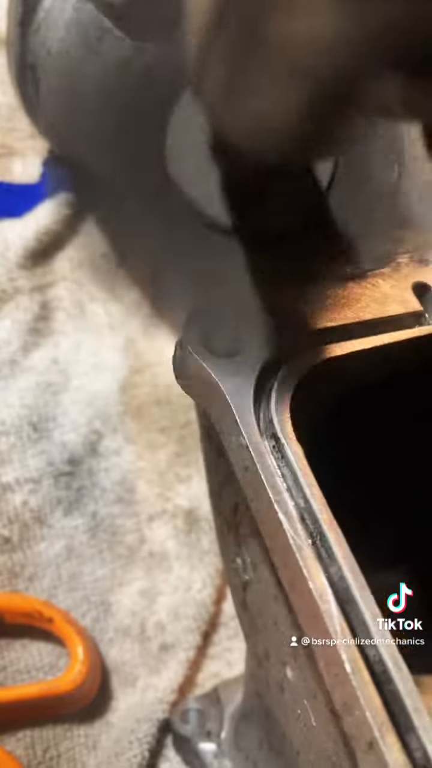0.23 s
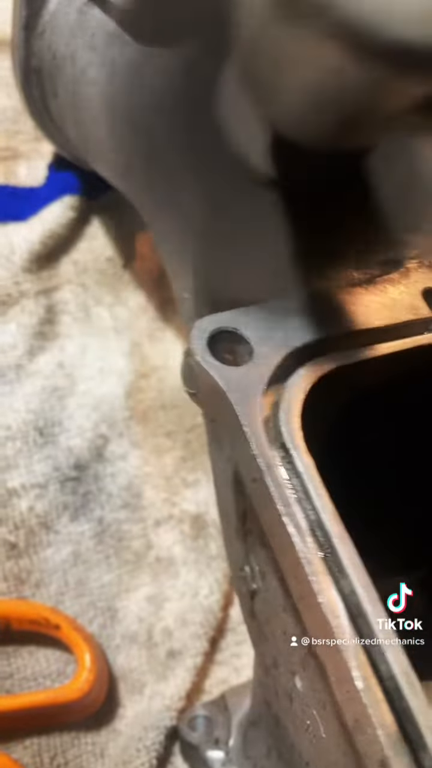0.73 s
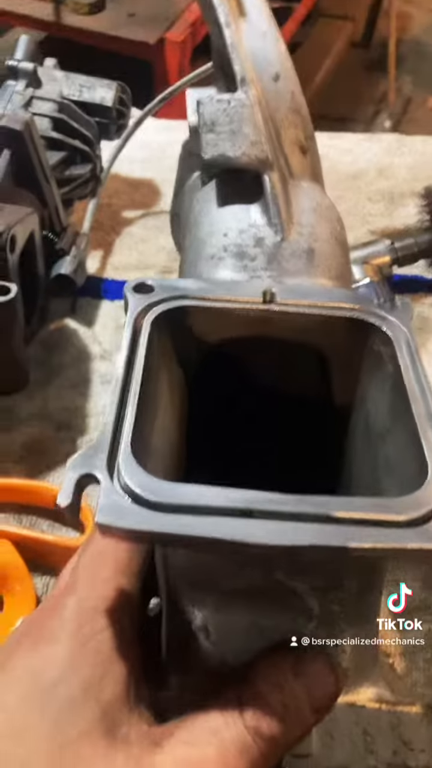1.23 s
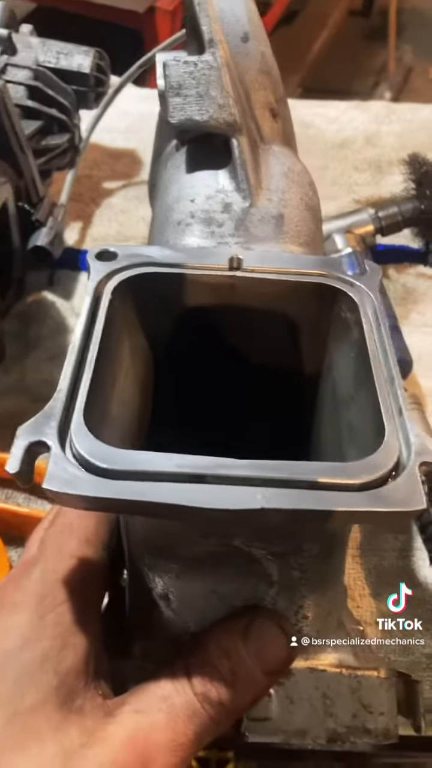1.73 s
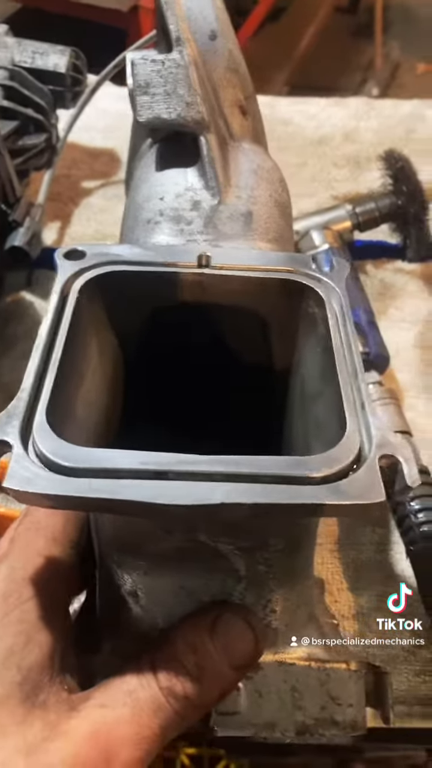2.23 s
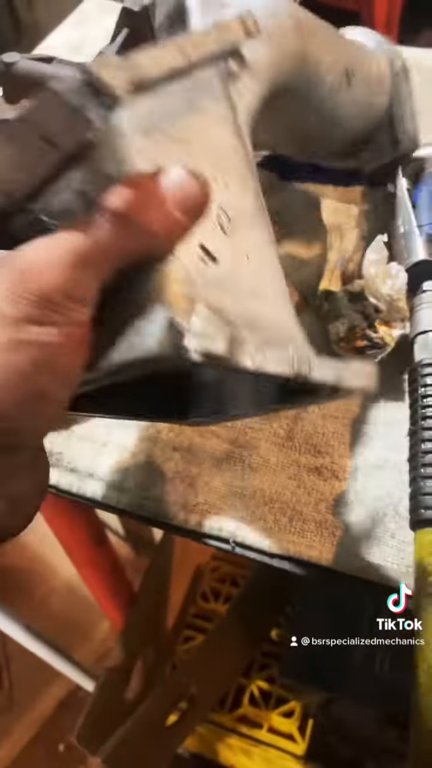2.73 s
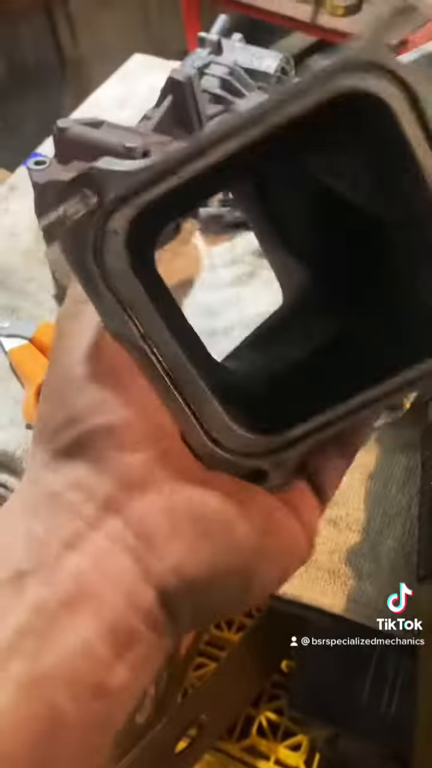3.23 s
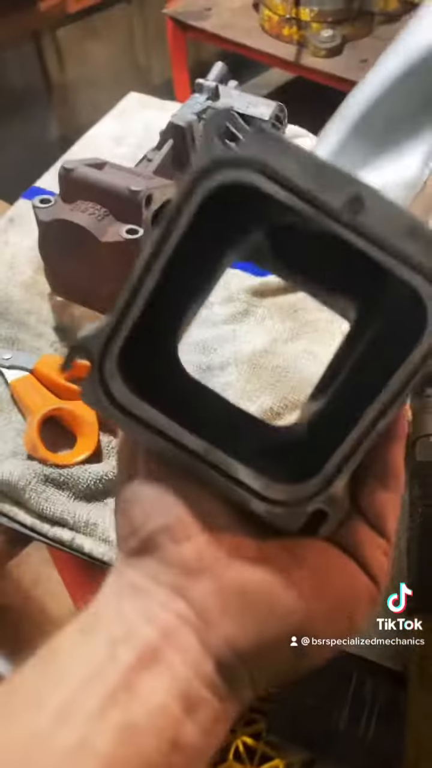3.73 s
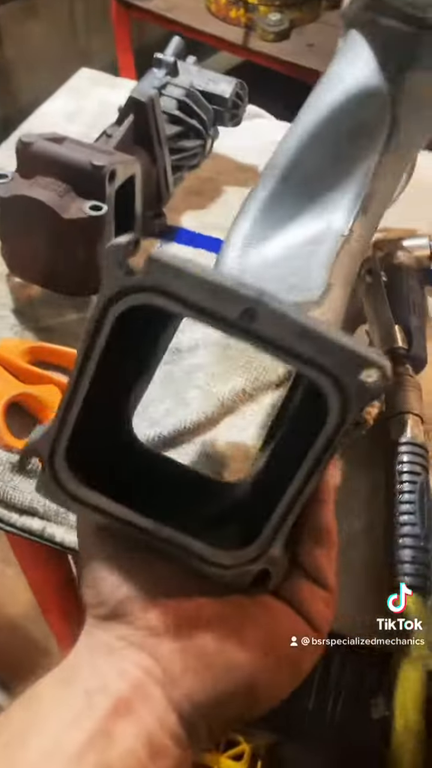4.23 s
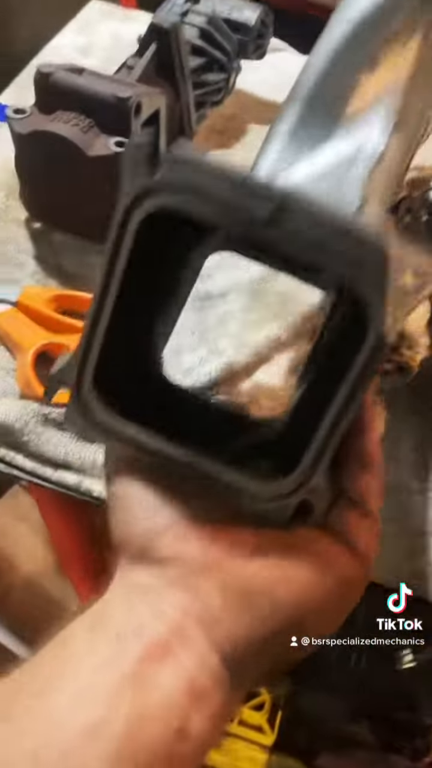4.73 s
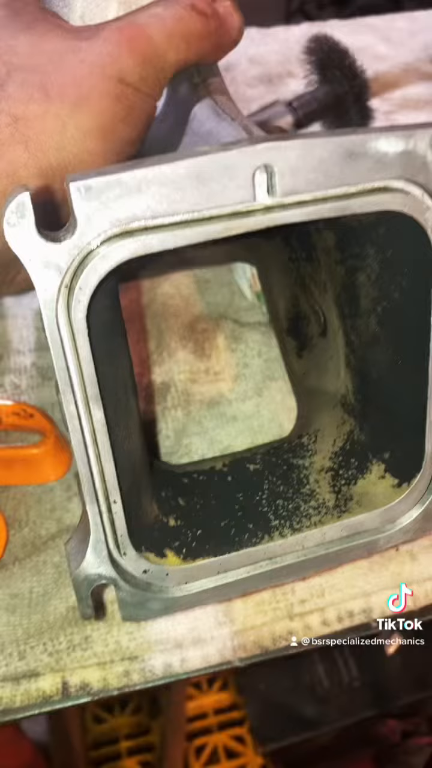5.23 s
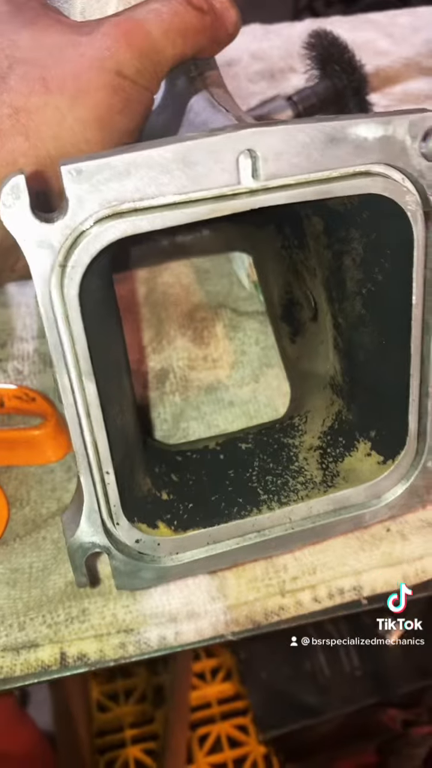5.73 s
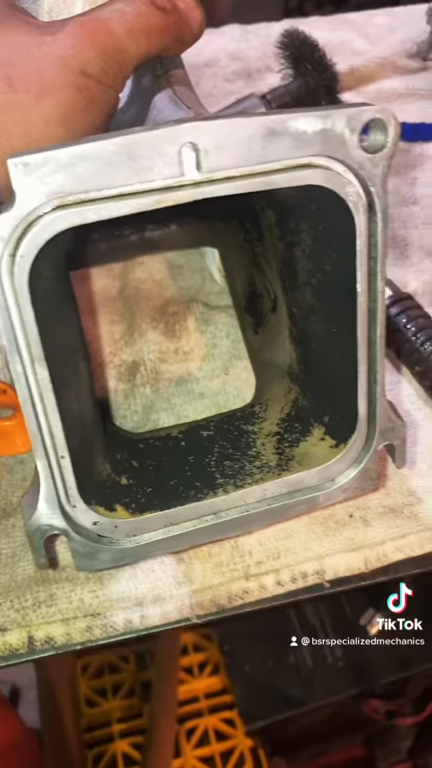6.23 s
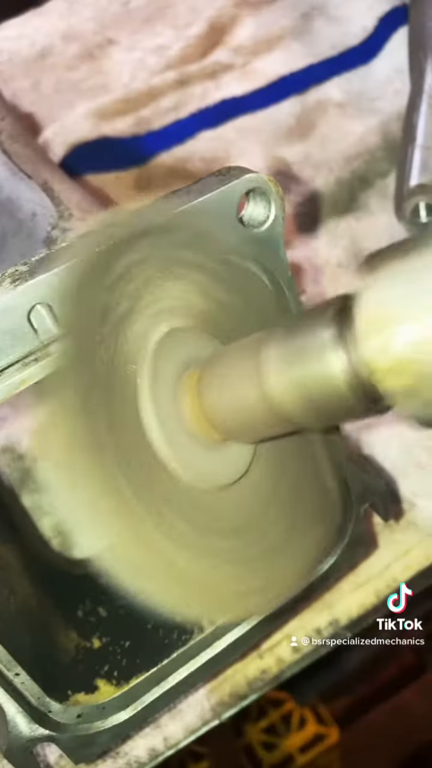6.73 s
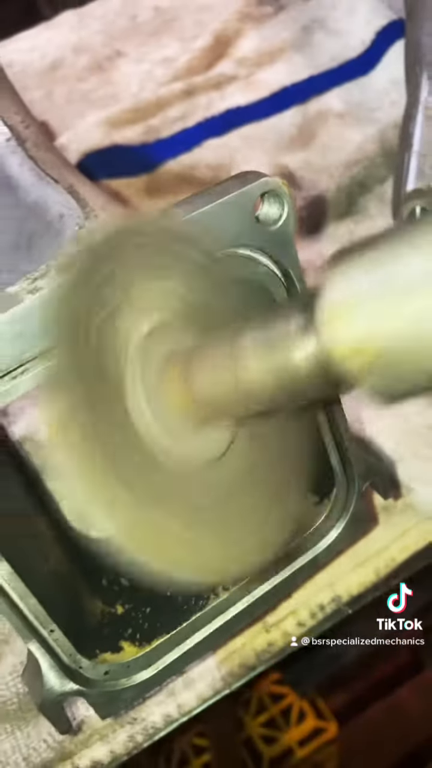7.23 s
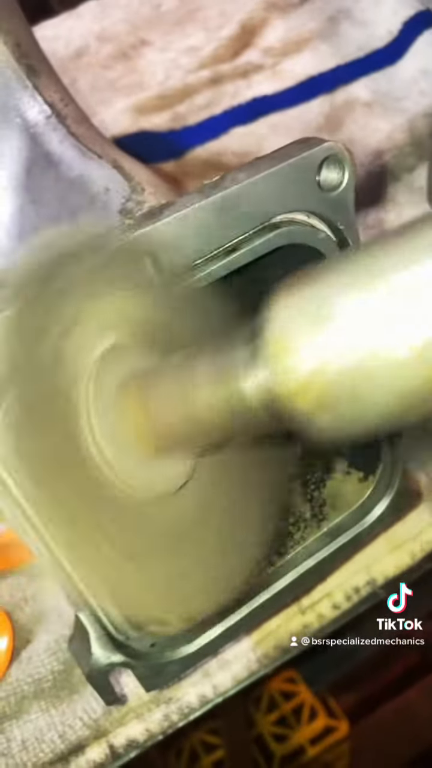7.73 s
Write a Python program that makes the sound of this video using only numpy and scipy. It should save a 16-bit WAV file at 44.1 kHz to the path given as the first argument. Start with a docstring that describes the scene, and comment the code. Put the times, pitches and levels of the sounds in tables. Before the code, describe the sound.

A high, wavering grinder whine and the scratch of a wire wheel on hollow aluminium open the sound, close up in a workshop. After a short silence, an air compressor hums and clatters steadily for about five seconds, cutting out briefly twice, and the casting bumps softly in the hand. Finally the wheel comes back with a louder, lower whine and harsh scraping, making the metal ring and squeal over the drone.

```python
"""First comes a high whine and scratch: an air die grinder runs a wire wheel over a hollow aluminium
casting, close by in a workshop. The whine sags whenever the wheel is pressed on, and each bite makes
the casting ring and squeal. A piston machine, likely the air compressor, drones underneath. It is heard
without the grinder between the two passes, when it also makes the air in the casting throb.
The sound comes in five short parts with silent pauses between them."""
import sys
import numpy as np
from scipy import signal
from scipy.fft import rfft, irfft
from scipy.io import wavfile
from scipy.ndimage import uniform_filter1d

SR = 44100
rng = np.random.default_rng(int(sys.argv[2]) if len(sys.argv) > 2 else 0)


def persist_wave(psi):
    """Save psi, clipped to +-1, as 16-bit WAV."""
    counts = np.round(np.clip(psi, -1, 1) * 32767).astype(np.int16)
    wavfile.write(sys.argv[1], SR, np.atleast_2d(counts).T)


N = 352800
TIME, BINS = np.arange(N) / SR, np.fft.rfftfreq(N, 1 / SR)
STROKE_HZ, CAVITY_HZ = 30.368, 1122  # piston rate; note of the air inside the casting

# the five parts: start t/s, end t/s, moment of one piston stroke t/s, compressor level/dB
PARTS = [(0, 1.05, 0.094, -14.5), (1.209, 2.4145, 1.305, 0), (2.588, 5.247, 2.52, 0),
         (5.423, 6.582, 5.465, 0), (6.776, 8.01, 7.8, -10)]
# rotor speed in the passes over the casting's neck and its flange (rim): t/s, f/Hz
NECK_SPEED = [(0.0, 662.2), (0.132, 626.6), (0.188, 632.9), (0.272, 619.2), (0.49, 723.4), (0.528, 737.2),
              (0.59, 735.9), (0.656, 668.5), (0.912, 747.4), (1.045, 738.3)]
FLANGE_SPEED = [(6.78, 431.6), (6.878, 416), (6.99, 440.4), (7.13, 360), (7.282, 398.4), (7.34, 388),
                (7.422, 350.8), (7.54, 435.5), (7.602, 477.6), (7.71, 503), (7.798, 482), (7.91, 508),
                (8.0, 486)]
# tones of the whine: multiple of the rotor speed, relative level/dB
NECK_WHINE = [(1, 0), (1.5, -28), (2, -7), (3, -13), (4, -.5), (5, -8), (6, -14), (8, -14)]
FLANGE_WHINE = [(1, 0), (2, -12), (3, -21), (4, -10), (5, -7), (6, -9), (7, -12), (8, -8.5), (9, -9.5),
                (10, -14), (11, -16)]
# spectrum of the scratching wires: f/Hz, relative level/dB
NECK_SCRATCH = [(150, -5), (500, -7.5), (900, -9.5), (1800, -12), (2150, -8), (2550, 4.5), (3100, -2.5),
                (3700, 3), (4900, -4), (6200, -1), (8300, -5), (9700, -0.5), (11200, -9), (15500, -15.5)]
FLANGE_SCRATCH = [(40, -17), (85, -1.5), (170, -14), (450, -17.5), (900, -14), (1700, -19.5), (2200, 2),
                  (3200, 2), (3650, -5), (4500, 0), (5400, -6.5), (7200, -6.5), (8400, -14.5), (10200, -11),
                  (12200, -21), (13600, -16), (15500, -27)]
# the wheel bites: t/s, half length t/s, change in scratch level/dB, ring level/dB, squeal f/Hz
BITES = [(0.02, 0.06, 0, -28, 5761), (0.11, 0.04, 1, -33.5, 6902), (0.24, 0.044, 0, -33.5, 6245),
         (0.53, .025, 0, -40, 5124), (0.641, 0.044, 2, -29.5, 6902), (6.778, .03, 4, -35, 3299),
         (6.845, 0.041, -1.5, -28.5, 5336), (7.003, 0.03, 0, -35, 3299), (7.08, .035, -2, -32.5, 5761),
         (7.168, 0.035, -1, -37, 6245), (7.27, .025, 1.5, -35, 3299), (7.373, .025, 1, -29, 5761),
         (7.415, .02, -1, -31, 5336), (7.46, 0.027, 0.5, -26, 3299), (7.47, .02, 1.5, -35, 5761),
         (7.72, 0.11, 0.5, -29.5, 3299), (7.8, .022, 0, -34, 5336)]
# the casting's ringing notes: f/Hz, relative level/dB brushed on the neck, the same on the flange
CASTING_NOTES = [(3299, -5, 0), (3530, -18, -12), (3855, -18, -12), (4325, -6, -22), (4521, -11, -9),
                 (5124, 0, -22), (5336, -18, -4), (5549, -7, -20), (5761, -5, 1.5), (6245, -5, -6),
                 (6600, -20, -8), (6902, 0, -20), (7321, -9, -10), (7482, -9, -8), (7573, -10, -20),
                 (8092, -20, -5), (8749, -5, -20), (8800, -20, -6), (9440, -8, -22), (10229, -8, -20),
                 (11649, -22, -13), (14260, -15, -22), (14648, -11, -26), (15000, -15, -28)]
# a thin whistle late in the first pass: t/s, level/dB
THIN_WHISTLE = [(.42, -68.5), (.52, -37.5), (.7, -48.5), (.9, -50), (1.02, -35)]
# the casting's open mouth in each of the three middle parts: throb level/dB, whistle level/dB
MOUTH = [(-33.5, -48), (-31.5, -43), (-32, -41.5)]
# the casting is turned in the hand: t/s, half length t/s, change in throb and in whistle level/dB
HAND_TURNS = [(2.12, 0.06, -4.5, 2), (2.85, 0.39, 7, -9.5), (3.5, 0.29, 4, 1), (3.85, 0.14, 0.5, 4),
              (6.3, .12, 5, 1.5)]
# hollow bands of hiss around the bench: f/Hz, width f/Hz, level/dB in each middle part
HOLLOWS = [(2530, 780, -57, -63, -45.5), (4300, 760, -44.5, -42, -40.5), (7100, 1700, -46.5, -51, -38.5),
           (10130, 1700, -39, -52, -59.5)]
# tones of the compressor's drone: multiple of the stroke rate, relative level/dB
DRONE = [(1, -36), (2, -17.5), (3, -10.5), (4, -7), (5, -10.5), (6, -16), (7, -30.5), (8, 2.5), (9, -12.5),
         (10, -7), (11, -10.5), (12, -11), (13, -36.5), (14, -5), (15, -24.5)]
# tones that change with the place in the room: multiple of the stroke rate, level/dB in each part
ROOM_TONES = [(16, -44.5, -26, -29.5, -26.5, -36), (18, -46.5, -29.5, -30.5, -35, -42.5),
              (19, -59.5, -39, -37, -35, -62), (20, -42.5, -30, -24, -36.5, -49),
              (21, -56, -37, -36.5, -35, -43.5), (32, -52.5, -35, -37, -36.5, -46),
              (43, -65.5, -42.5, -42, -55, -64), (50, -64.5, -63, -48, -53, -47),
              (52, -61, -63.5, -48, -48.5, -65), (80.95, -61.5, -47.5, -49, -45, -52)]
# spectra of the compressor's valve clatter and rushing air: f/Hz, relative level/dB
CLATTER = [(600, -10.5), (700, 5.5), (950, 0.5), (1280, -9.5), (1400, -14.5), (2400, -9), (3000, -10.5),
           (4400, -11), (6800, -10.5), (8300, -22), (10300, -9), (11500, -19.5), (15500, -29)]
AIR = [(25, -20), (42, -20), (65, -6), (110, -7), (190, -11), (260, -11.5), (400, -8.5), (900, -13.5),
       (1220, -9), (1600, -21.5), (6000, -26), (8400, -27), (10600, -32), (11800, -40), (15700, -46)]


def grinder(speed, tones, spectrum, place, whine_db, scratch_db, sizzle_db, ring_db, high_ring_db,
            whine_fade_db_per_s, scratch_fade_db_per_s, sizzle_db_per_octave, sizzle_bite, jitter):
    """One pass of the wheel: the rotor sets the whine's pitch and the rhythm of the scratching wires."""
    times, speed_hz = np.transpose(speed)
    hz = np.interp(TIME, times, speed_hz)
    elapsed = np.clip(TIME, times[0], times[-1]) - times[0]
    bite_db = sum(db * swell(at, half_s) for at, half_s, db, *_ in BITES)
    turns = np.cumsum(uniform_filter1d(hz, 1500) * (1 + jitter * wander(70))) / SR
    strikes = wires(turns)
    scratch = colour(reflections(strikes, depth_db=2.8, drift_frames=60), spectrum)
    low = band(scratch, 0.87, 6000)
    body = gain_of(scratch_db + bite_db) * low / np.std(band(scratch, 2000, 5000))
    fast_db = sizzle_db_per_octave * np.log2(hz / speed_hz.mean())  # faster wire tips sizzle more
    high = (scratch - low) / np.std(band(scratch, 7700, 15000))
    sizzle = gain_of(sizzle_db + sizzle_bite * bite_db + fast_db) * high
    tone = gain_of(whine_db - whine_fade_db_per_s * elapsed) * whine(turns, hz, tones)
    brushing = gain_of(-scratch_fade_db_per_s * elapsed) * (body + sizzle)
    return tone + brushing + casting(strikes, place, ring_db, high_ring_db)


def whine(turns, hz, tones, shimmer=0.14, rev_db_per_octave=8, weak_db=9, weak_below_hz=1940):
    """The rotor's unbalance and vanes make unsteady tones, each swelling near the casting's hollow note."""
    out = np.zeros(N)
    octaves = np.log2(hz / np.sqrt(hz.min() * hz.max()))  # above the middle speed
    for multiple, db in tones:
        cavity_db = 15 / (1 + ((multiple * hz - CAVITY_HZ + 45) / 115) ** 2)
        too_low = 1 / (1 + (multiple * hz / weak_below_hz) ** 60)
        # the upper tones grow as the rotor runs free, and carry poorly when their pitch is low
        vanes_db = (rev_db_per_octave * octaves - weak_db * too_low) * (multiple >= 4)
        level = gain_of(db + cavity_db + vanes_db) * (1 + shimmer * wander(60))
        out += level * np.cos(2 * np.pi * (multiple * turns + rng.random()))
    return np.sqrt(2) * out


def wires(turns, strikes_per_s=11000, size_db=0.5, lopsided=0.1, hiss=.8):
    """Wire tips flick the metal, harder on one side of the wheel, over the hiss of the exhaust."""
    size = gain_of(size_db * np.minimum(rng.exponential(1, N), 5))
    strikes = rng.standard_normal(N) * size * (rng.random(N) < strikes_per_s / SR)
    exhaust = hiss * rng.standard_normal(N)
    return (unit_rms(strikes) + exhaust) * (1 + lopsided * np.cos(2 * np.pi * turns))


def casting(strikes, place, rest_db, high_db, spread_db=-3, squeal_db=5, width_hz=7):
    """Wires ring the neck (place 0) or flange (1); each bite swells all the notes and makes one squeal."""
    note_hz = np.transpose(CASTING_NOTES)[0]
    ring, squeals = gain_of(rest_db), [0] * len(note_hz)
    for at, half_s, _, db, hz in BITES:
        push = gain_of(db) * swell(at, half_s)
        ring = ring + gain_of(spread_db) * push
        nearest = np.argmin(abs(note_hz - hz))
        squeals[nearest] += gain_of(squeal_db) * push
    out = np.zeros(N)
    for (hz, *dbs), squeal in zip(CASTING_NOTES, squeals):
        note = resonate(strikes, hz, width_hz)
        note /= np.sqrt(uniform_filter1d(note ** 2, size=1400) + 1e-6)  # steady rubbing keeps it going
        out += note * np.hypot(ring * gain_of(dbs[place] + high_db * (hz > 5450)), squeal)
    return out


def thin_whistle(hz=1330, width_hz=9):
    """Air from the wheel sings on one narrow note."""
    level = gain_of(np.interp(TIME, *np.transpose(THIN_WHISTLE)))
    return level * resonate(rng.standard_normal(N), hz, width_hz)


def bump(at=3.83, hz=110, db=-23, rise_s=0.0204):
    """The casting bumps in the hand with a soft, dull knock."""
    age = np.maximum(TIME - at, 0)
    return gain_of(db) * age / rise_s * np.exp(1 - age / rise_s) * np.sin(2 * np.pi * hz * age)


def compressor(part, motor_hz=58.3, motor_db=-36, drift=.0005):
    """One crank drives the drone, clatter and air; the motor's hum beats slowly against the drone."""
    stroke_s, level_db = np.transpose(PARTS)[2:]
    level, clock = gain_of(level_db)[part], TIME - stroke_s[part]
    turns = STROKE_HZ * (clock + np.cumsum(drift * wander(8.8)) / SR)
    motor = np.sqrt(2) * gain_of(motor_db) * np.cos(2 * np.pi * motor_hz * clock)
    noise = level * (clatter(turns) + air(turns)) + cavity(turns, part)
    hum = drone(turns, part, level) + level * motor
    return hum + np.std(noise) * reflections(noise, depth_db=2.7, drift_frames=220)


def drone(turns, part, level, drone_db=-20, waver_db=0.66, scatter_rad=1.4):
    """The piston makes a stack of tones; the room shifts their timing and favours some in each place."""
    total = np.linalg.norm(gain_of(np.transpose(DRONE)[1]))
    gains = {round(k): level * gain_of(drone_db + db) / total for k, db in DRONE}
    gains.update({round(k): gain_of(dbs)[part] for k, *dbs in ROOM_TONES})
    # the tones stay partly in step: one knock a stroke
    phases = scatter_rad * rng.uniform(-1.06, 1, (len(gains), len(PARTS)))
    phases *= 1 + (np.array(list(gains)) % 2)[:, None] / 2  # odd multiples scatter more
    wavers = [gain_of(waver_db * wander(7.4)) for _ in range(3)]
    return np.sqrt(2) * sum(gain * wavers[k % 3] * np.cos(2 * np.pi * k * turns + phase[part])
                            for (k, gain), phase in zip(gains.items(), phases))


def clatter(turns, db=-30, uneven=0.099):
    """The valves rattle in the same pattern on every stroke."""
    stroke_samples = round(SR / STROKE_HZ)
    pattern = irfft(np.exp(2j * np.pi * rng.random(stroke_samples // 2 + 1)), stroke_samples * 10)
    rattle = np.interp(turns % 1, np.linspace(0, 1, len(pattern)), pattern)
    rattle = colour(band(rattle, 660, SR / 2), CLATTER)
    return gain_of(db) * rattle * (1 + uneven * wander(30))


def air(turns, db=-28.5, puff=0.57, puff_turns=.25, flutter=0.077):
    """Moving air rumbles and hisses, with eight flutters and one bright puff to a stroke."""
    noise = colour(rng.standard_normal(N), AIR)
    noise *= 1 + flutter * np.cos(2 * np.pi * 8 * turns)
    burst = np.exp(-((turns + 0.42) % 1) / puff_turns)
    return gain_of(db) * (noise + puff * burst * band(noise, 5900, 12000))


def cavity(turns, part, whistle_hz=3380):
    """In the middle parts each stroke rings the air in the open casting, and the hiss sounds hollow."""
    row = np.clip(part - 1, 0, 2)
    turning_db = sum(np.outer(dbs, swell(at, half_s)) for at, half_s, *dbs in HAND_TURNS)
    throb_db, whistle_db = np.array(MOUTH)[row].T + turning_db
    strokes = np.diff(np.floor(turns - .1), prepend=0) == 1
    ringing = resonate(strokes * 1., CAVITY_HZ, width_hz=20)
    throb = gain_of(throb_db) * unit_rms(band(ringing, 1040, 1330))
    whistle = gain_of(whistle_db) * hollow(whistle_hz, width_hz=230)
    hiss = sum(gain_of(dbs)[row] * hollow(hz, width) for hz, width, *dbs in HOLLOWS)
    return (throb + whistle + hiss) * (part > 0) * (part < len(PARTS) - 1)


def reflections(x, depth_db, drift_frames):
    """Echoes from nearby put narrow peaks and dips in the treble, which drift as things move."""
    hz, _, frames = signal.stft(x, SR, nperseg=1024, noverlap=768)
    field = uniform_filter1d(rng.standard_normal(frames.shape), size=drift_frames, axis=1)
    field = uniform_filter1d(field, size=2, axis=0)
    depth = depth_db * np.clip(hz / 1200 - .7, 0, 1)[:, None]
    ripple = gain_of(depth * unit_rms(field))
    ripple /= np.exp((depth * np.log(10) / 20) ** 2)  # keeps the average power
    return unit_rms(signal.istft(frames * ripple, nperseg=1024, noverlap=768)[1][:N])


def hollow(hz, width_hz):
    """Hiss gathered closely around one pitch."""
    return resonate(resonate(rng.standard_normal(N), hz, width_hz), hz, width_hz)


def resonate(x, hz, width_hz):
    """Lets x ring at one pitch; a smaller width rings longer."""
    r = np.exp(-np.pi * width_hz / SR)
    return unit_rms(signal.lfilter([1, 0, -1], [1, -2 * r * np.cos(2 * np.pi * hz / SR), r * r], x))


def colour(x, spectrum):
    """Shapes the lows and highs of x to follow a spectrum table."""
    hz, db = np.transpose(spectrum)
    curve_db = np.interp(np.log(BINS + 1), np.log(hz + 1), db)
    return unit_rms(irfft(rfft(x) * gain_of(curve_db), N))


def band(x, lo_hz, hi_hz):
    """Keeps one range of pitches, with soft edges."""
    return irfft(rfft(x) / np.sqrt((1 + (lo_hz / (BINS + 1)) ** 20) * (1 + (BINS / hi_hz) ** 20)), N)


def wander(rate):
    """A smooth random wobble, changing about rate times a second."""
    return unit_rms(irfft(rfft(rng.standard_normal(N)) * np.exp(-(BINS / rate) ** 2), N))


def swell(at, half_s):
    """A smooth rise and fall that reaches 1 at the given time."""
    return np.exp(-((TIME - at) / half_s) ** 2)


def gain_of(db):
    """Turns decibels into a multiplier."""
    return 10 ** (np.asarray(db) / 20)


def unit_rms(x):
    """Scales x to an average strength (rms) of 1."""
    return x / np.sqrt(np.mean(x ** 2) + 1e-20)


def scene():
    """The grinder works in the first and last parts, the compressor in all five; the pauses are silent."""
    starts, ends = np.transpose(PARTS)[:2]
    part = np.searchsorted((ends[:-1] + starts[1:]) / 2, TIME)  # which part each moment belongs to
    neck = grinder(NECK_SPEED, NECK_WHINE, NECK_SCRATCH, place=0,
                   whine_db=-31, scratch_db=-28, sizzle_db=-28.5, ring_db=-45, high_ring_db=0,
                   whine_fade_db_per_s=2.5, scratch_fade_db_per_s=-1,
                   sizzle_db_per_octave=3.5, sizzle_bite=2.9, jitter=.003)
    flange = grinder(FLANGE_SPEED, FLANGE_WHINE, FLANGE_SCRATCH, place=1,
                     whine_db=-21, scratch_db=-17, sizzle_db=-24.5, ring_db=-34.5, high_ring_db=-2.5,
                     whine_fade_db_per_s=5, scratch_fade_db_per_s=4.5,
                     sizzle_db_per_octave=4.5, sizzle_bite=0.33, jitter=0.00341)
    mix = compressor(part) + bump()
    mix += (neck + thin_whistle()) * (part == 0) + flange * (part == len(PARTS) - 1)
    audible = sum((TIME >= start) & (TIME < end) for start, end in zip(starts, ends))
    return np.array([mix, mix]) * audible


def record(dry, ceiling=.85, top_hz=15800):
    """Gently rounds off the loudest peaks, then cuts the highest treble."""
    rounded = dry / (1 + (dry / ceiling) ** 6) ** (1 / 6)
    lowpass = signal.firwin(511, top_hz, window=("kaiser", 9), fs=SR)
    return signal.oaconvolve(rounded, lowpass[None], "same")


dry = scene()
out = record(dry)
persist_wave(out)
```